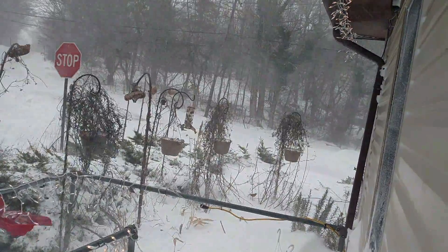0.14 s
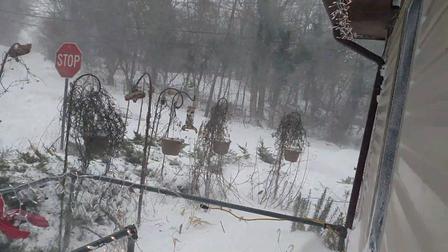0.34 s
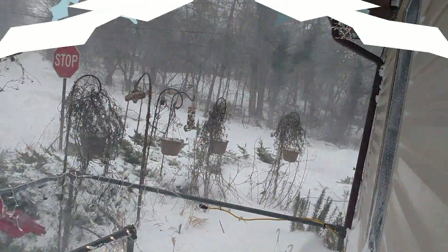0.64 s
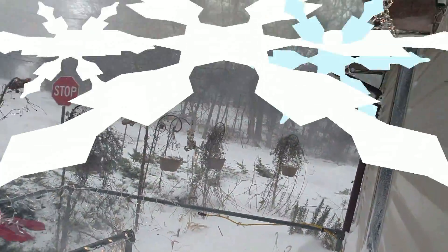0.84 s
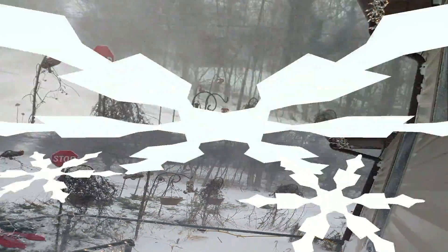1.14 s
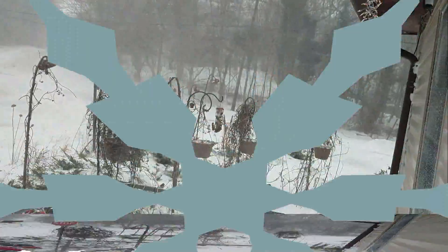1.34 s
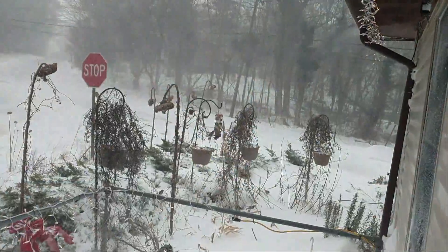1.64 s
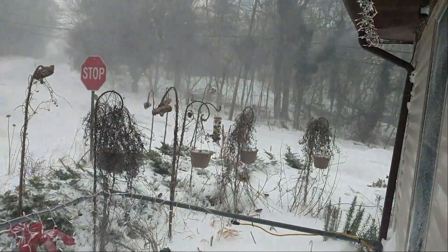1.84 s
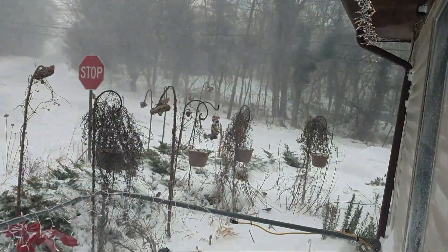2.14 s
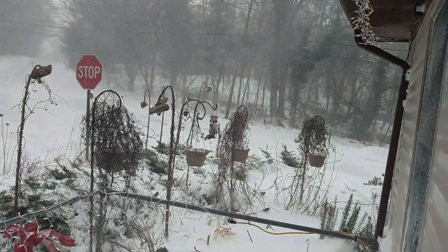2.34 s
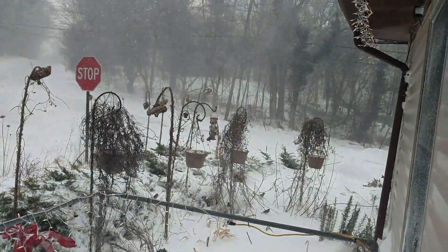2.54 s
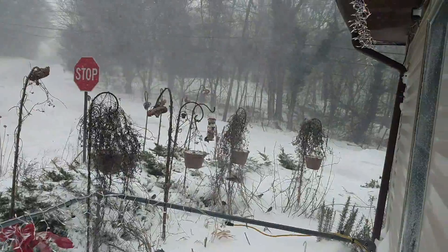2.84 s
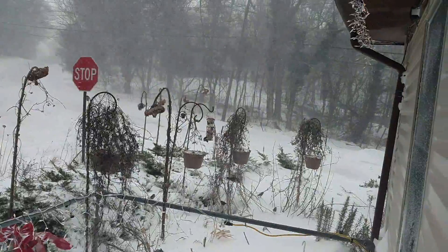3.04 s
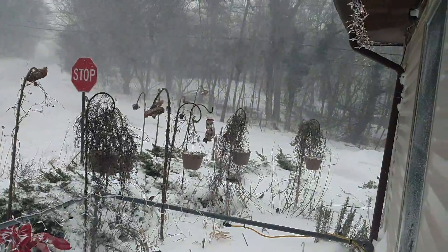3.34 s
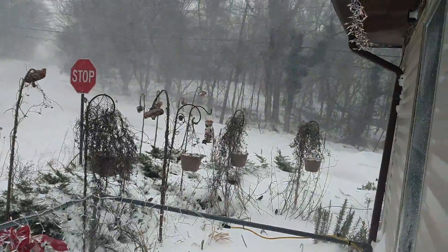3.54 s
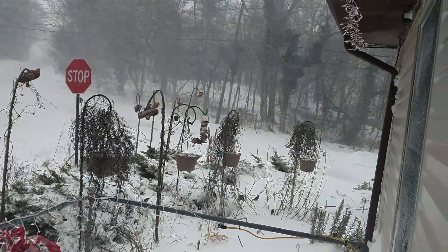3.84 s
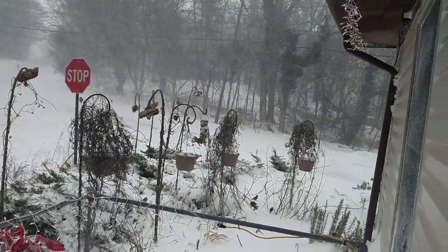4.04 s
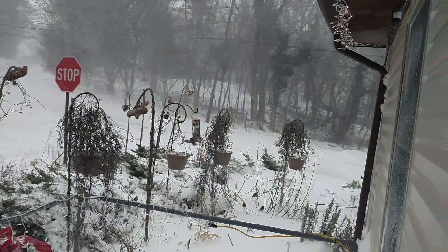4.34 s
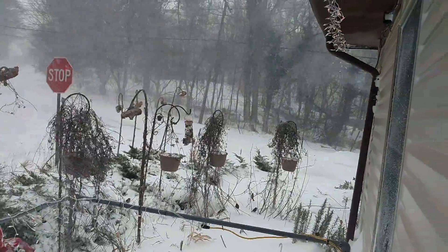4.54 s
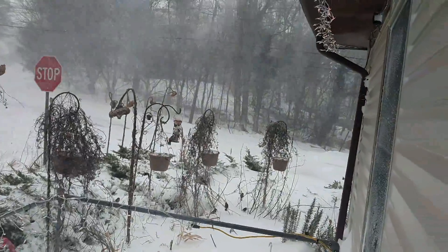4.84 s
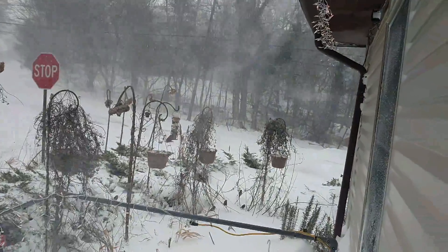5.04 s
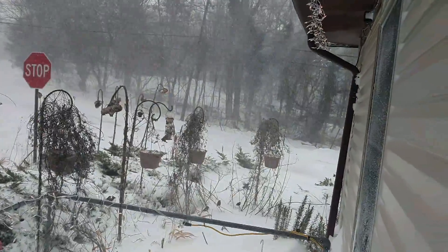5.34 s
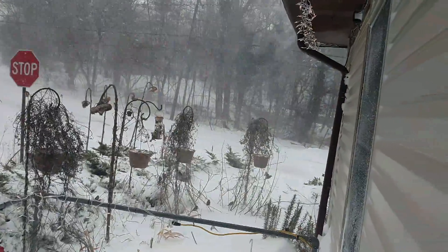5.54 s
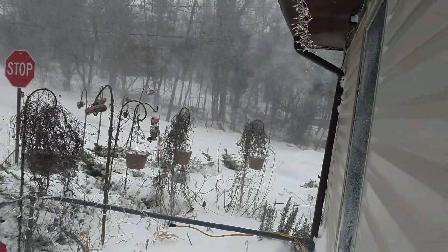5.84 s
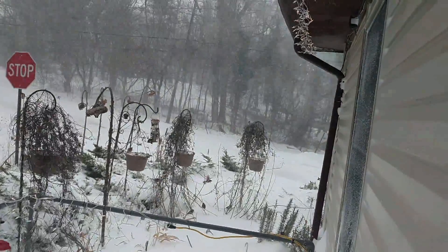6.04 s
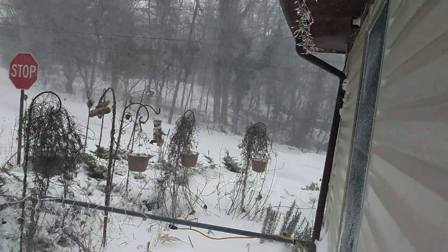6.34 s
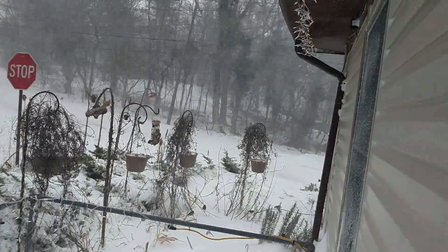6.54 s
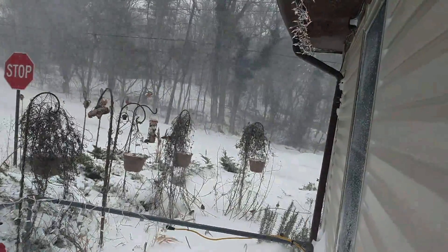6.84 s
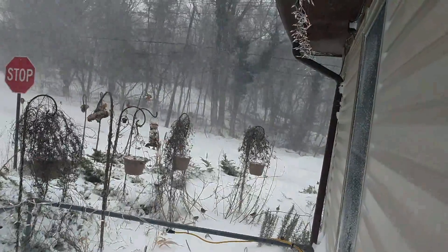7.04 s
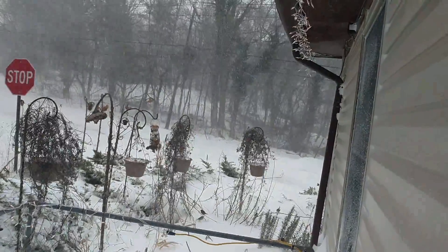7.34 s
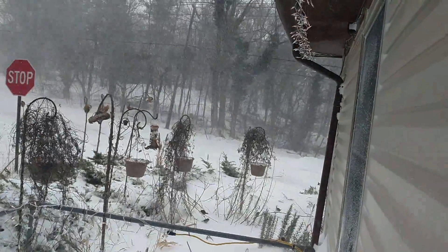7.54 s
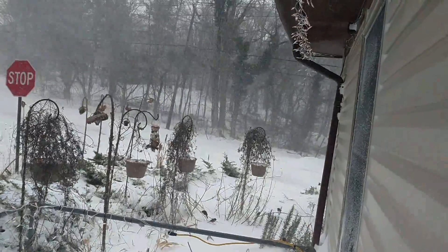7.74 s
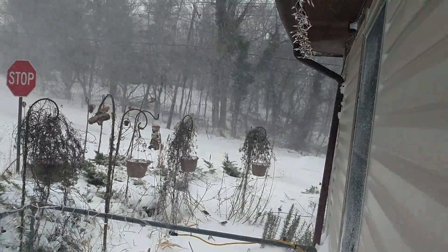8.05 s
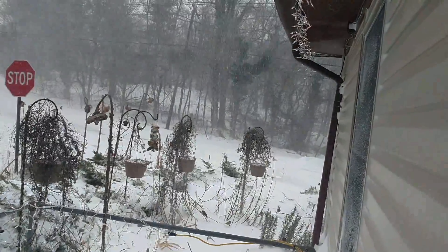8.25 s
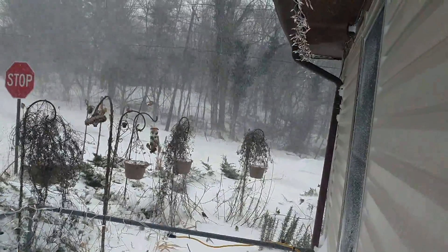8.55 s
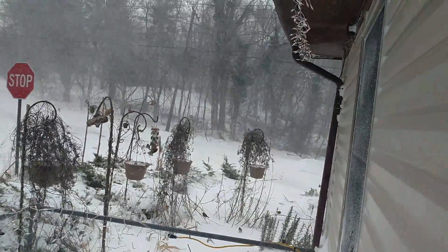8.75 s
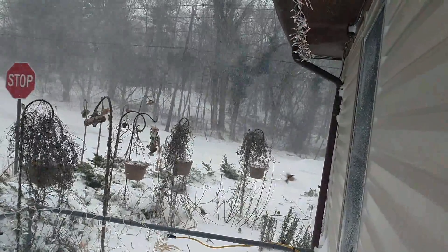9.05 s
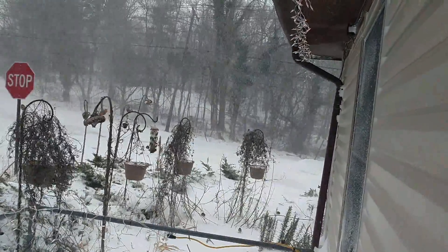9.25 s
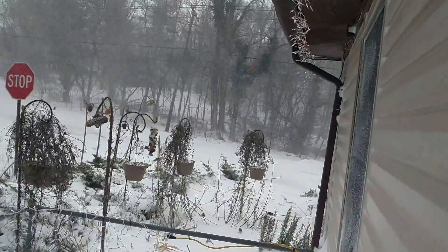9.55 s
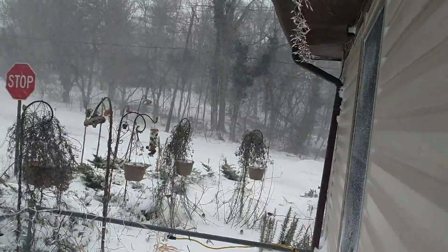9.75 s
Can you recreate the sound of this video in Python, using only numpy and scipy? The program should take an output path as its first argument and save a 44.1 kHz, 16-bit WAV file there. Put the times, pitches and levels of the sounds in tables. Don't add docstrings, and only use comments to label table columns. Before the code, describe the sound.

A handheld camera in a blizzard: sharp clicks, rough rubbing and a short creak come first, pulling the wind level down. The wide roar of trees returns with a fine snow hiss and a couple of dull pops. From about four seconds low buffeting batters both sides of the microphone in irregular bursts, heaviest past six, with a breathy high whistle and sprays of snow, before a calmer stretch and late knocks of wind.

```python
import sys
import numpy as np
from scipy import signal
from scipy.fft import rfft, irfft, next_fast_len
from scipy.io import wavfile
from scipy.ndimage import uniform_filter1d, map_coordinates

SR = 44100
rng = np.random.default_rng(int(sys.argv[2]) if len(sys.argv) > 2 else 0)


def store_pcm(level_fs):
    pcm = np.round(np.clip(level_fs, -1, 1) * 32767).astype(np.int16)
    wavfile.write(sys.argv[1], SR, np.atleast_2d(pcm).T)


def volts_from_db(level):
    exponent = np.asarray(level, float) / 20
    return 10 ** exponent


N = 437031


def unit(x):
    return x / np.sqrt(np.mean(x ** 2) + 1e-20)


def along(points, hz):
    f, v = np.transpose(points)
    return np.interp(np.log(hz + 1), np.log(f + 1), v)


def curves(rows):
    s, *columns = np.transpose(rows)
    s = np.maximum.accumulate(s)
    return [np.interp(np.arange(N) / SR, s, column) for column in columns]


def wobble(rate):
    knots = rng.standard_normal(6000)
    return map_coordinates(knots, [np.arange(N) * min(rate, 590) / SR])


def filtered(x, response):
    m = next_fast_len(x.shape[-1] + 8192)
    spectrum = rfft(x, m) * response(np.fft.rfftfreq(m, 1 / SR))
    return irfft(spectrum, m)[..., :x.shape[-1]]


def add(track, s, piece):
    start = round(s * SR)
    track[:, start:start + piece.shape[1]] += piece


def far(spectrum, patchy_db):
    # (frequency [Hz], likeness [0-1])
    alike = [(100, 0.96), (300, 1), (450, 0.89), (750, 0.76), (1000, 0.4), (1200, 0.4), (1500, 0.48),
             (2000, 0.66), (2400, 0.43), (8000, 0.057)]
    # (frequency [Hz], level [dB])
    louder = [(50, 0), (300, 3), (800, 5), (1400, 4.5), (1900, 0), (2500, 0.5), (5000, -1), (8000, -4.5),
              (11000, -2)]
    # (frequency [Hz], delay [ms])
    late_ms = [(100, 0.12), (400, 0.18), (800, 0.23), (1400, 0.33), (2100, 0.272)]

    z = signal.stft(rng.standard_normal((2, N)), nperseg=512)[2]
    patches = uniform_filter1d(rng.standard_normal(z.shape[1:]), size=6, axis=0)
    patches = uniform_filter1d(patches, size=10, axis=1)
    pair = signal.istft(z * volts_from_db(patchy_db * unit(patches)), nperseg=512)[1][:, :N]

    def split(hz):
        angle = np.arccos(np.clip(along(alike, hz), 0, 1)) / 2
        return volts_from_db(along(spectrum, hz)) * [np.cos(angle), np.sin(angle)]

    def skew(hz):
        half = volts_from_db(along(louder, hz) / 2) * np.exp(-1j * np.pi * hz * along(late_ms, hz) / 1000)
        return np.array([1 / half, half])

    shared, own = filtered(pair, split)
    return unit(filtered(np.array([shared + own, shared - own]), skew))


def storm():
    # (time [s], strength [dB], snow load [dB])
    wind = [(0, -17, -6), (.3, -21, 1), (.6, -11, 1), (1.0, -17.5, 4), (1.3, -13, -3), (1.65, -13, 0.5),
            (2.1, -12, -2), (2.8, -12, 0), (3.8, -15, -1.5), (4.3, -14.5, 4), (4.75, -16.5, 3.5),
            (5.8, -15.5, 1), (6.3, -17.5, 3), (7.4, -18.5, 2.5), (8.3, -12.5, 1), (8.8, -16.5, 1),
            (9.1, -15.5, 0), (9.91, -16, 1.5)]
    # (centre [s], length [s], level [dB])
    surges = [
        (1.973, 0.15, 2),
        (2.55, .2, -1),
        (3.706, 0.45, -1.5),
        (4.204, 0.22, -2),
        (6.85, 0.12, 0.5),
        (9.013, 0.55, 1),
        (9.353, 0.19, -2),
    ]
    # (frequency [Hz], density [dB per Hz])
    roar_spectrum = [(15, -42), (30, -32), (60, -23.5), (110, -6), (170, 1.5), (260, 1.5), (400, -4.5),
                     (600, -8), (850, -11.5), (1200, -24), (2000, -24), (4000, -57.5)]
    # (frequency [Hz], density [dB per Hz])
    hiss_spectrum = [(500, -75), (1000, 3.5), (1400, -1), (1900, 0), (2500, -5), (3500, -5.5), (4500, -11),
                     (6000, -14.5), (9000, -23.5), (16000, -104)]
    # (frequency [Hz], density [dB per Hz])
    spray_spectrum = [(2000, -27), (5000, 7.5), (7000, -3.5), (9000, -3), (11000, -9), (14000, -15),
                      (16000, -24)]
    hiss_db, hiss_per_snow, spray_db = -14, 0.074, -24

    wind_db, snow_db = curves(wind)
    gust = 0.5 * wobble(19) + 0.14 * wobble(3.23)
    roar = volts_from_db(4.0 + gust) * far(roar_spectrum, patchy_db=1.0)
    hiss_level = hiss_db + hiss_per_snow * snow_db + 5 + gust + 0.74 * wobble(14)
    hiss = volts_from_db(hiss_level) * far(hiss_spectrum, patchy_db=1.04)
    spray_level = spray_db + snow_db + gust + 0.53 * wobble(6)
    spray = volts_from_db(spray_level) * far(spray_spectrum, patchy_db=2.5)
    t = np.arange(N) / SR
    for s, length, db in surges:
        wind_db = wind_db + db * np.exp(-(2 * (t - s) / length) ** 2)
    return volts_from_db(wind_db + gain_db()) * (roar + hiss + spray)


def gain_db():
    # (time [s], depth [dB])
    ducks = [
        (0, 5.5),
        (0.349, 13.5),
        (.49, 21),
        (.62, 20),
        (.79, 21.5),
        (1.21, 16.5),
        (4.48, 2.5),
        (4.782, 9),
        (6.457, 11.5),
        (9.29, 0.5),
    ]
    hold_s, recover_s = 0.089, 0.9
    t = np.arange(N) / SR
    returns = []
    for s, db in ducks:
        fade = np.exp(-np.clip(t - s - hold_s, 0, None) / recover_s)
        returns.append(-db * (t >= s) * fade)
    return np.min(returns, axis=0)


def thumps():
    out, t = np.zeros((2, N + SR)), np.arange(-1000, 1400) / SR
    starts = .3 * rng.random(200) - .15
    for (s, db, hz, share), start in zip(eddies(), starts):
        envelope = np.exp(-(t * hz / np.where(t < 0, .6, .95)) ** 2)
        swing = envelope * np.cos(2 * np.pi * (hz * t + start))
        spike = (1 - share) * volts_from_db(.3 * db) * np.exp(-(t * hz / .085) ** 2)
        add(out, s + t[0], 1.13 * volts_from_db(db) * np.outer([share, share - 1], swing + spike))
    return filtered(out[:, :N], lambda hz: (1j * hz / (72 + 1j * hz)) ** 2)


def eddies():
    # (time [s], peak [dB], ring [Hz], share on first port [0-1])
    strong = [(4.29, -8, 190, 0.3), (4.655, -8, 120, 0.1), (4.738, -2, 180, 0.5), (4.779, -3, 222, 0),
              (5.035, -2, 139, 0.04), (5.188, 4, 140, 0.57), (5.286, -2, 151, 0.65), (5.717, -7, 131, 0.85),
              (5.836, -5.5, 139, .2), (6.051, -9, 130, 0.7), (6.172, -3, 130, 0.3), (6.198, -2, 130, 0.55),
              (6.397, -3, 119, 0.2), (6.425, 0, 200, 0.1), (6.459, -3, 160, 0), (6.505, 0, 186, 1),
              (6.53, -3, 162, 0), (6.584, 2.5, 192, 0.9), (6.789, -2, 175, 0), (6.812, 4, 180, 0.1),
              (6.835, -2, 191, 0.4), (6.876, -0.5, 172, 0.07), (6.977, -14, 140, 0.3),
              (7.157, -1, 200, 0.07), (7.224, 0, 178, 0), (7.253, -5, 140, 0.13), (7.472, -2, 180, 0.93),
              (7.664, -5, 150, 0), (9.286, -19, 160, 0.4), (9.871, -8, 161.3, 0)]
    # (time [s], peak [dB])
    grips = [
        (0.623, -11),
        (0.657, -17),
        (.772, -7.5),
        (0.833, -10.5),
        (0.871, -17),
        (0.923, -14),
        (1.184, -19),
        (1.217, -1.5),
        (1.233, -25),
        (1.377, -15),
    ]
    # (time [s], peak [dB])
    lesser = [(0.048, -26), (0.118, -21), (0.136, -22), (0.172, -22), (0.254, -24), (0.277, -18),
              (0.31, -27), (0.489, -18), (0.576, -15), (0.593, -24), (0.673, -16), (0.746, -10),
              (0.793, -19), (0.887, -26), (0.906, -24), (1.079, -24), (1.198, -19), (1.273, -11.5),
              (1.298, -30), (1.332, -26), (1.394, -21), (1.494, -22), (3.594, -9), (3.896, -10),
              (3.919, -13), (3.997, -9), (4.372, -18), (4.463, -6), (4.483, -11), (4.636, -18),
              (4.753, -12), (4.806, -11), (5.094, -11), (5.208, -10), (5.337, -12), (5.804, -10),
              (5.854, -12), (5.872, -10), (5.901, -13), (6.184, -5), (6.265, -5), (6.446, -10),
              (7.005, -10.5), (7.097, -3), (7.143, -4), (7.192, -8), (7.285, -18), (7.712, -11),
              (7.897, -10), (7.937, -14), (8.672, -15), (8.992, -13), (9.091, -13), (9.272, -4),
              (9.309, -8), (9.332, -13), (6.887, -4), (6.8, -8), (6.563, -11), (6.71, -13)]
    grip_hz, grip_share = 200, 0.083
    small_db, small_hz = 1, 162

    hits = [*strong]
    hits += [(s, db, grip_hz, grip_share) for s, db in grips]
    pitch, side = rng.random((72, 2)).T
    for (s, db), p, d in zip(lesser, pitch, side):
        hits.append((s, db + small_db, small_hz * 2 ** (0.71 * (p - .5)), d ** 2))
    return hits


def buffet():
    # (frequency [Hz], density [dB per Hz])
    eddy_spectrum = [(10, -30), (20, -54), (50, -2), (80, 1), (140, 6), (200, -18), (300, -5.5),
                     (500, -15.5), (1000, -25), (3000, -53.5)]
    hits = rng.random((2, N)) < 90 / SR
    patter = hits * rng.standard_normal((2, N))
    churn = unit(patter) + .8 * rng.standard_normal((2, N))
    churn = churn - .4 * churn[::-1]
    churn = unit(filtered(churn, lambda hz: volts_from_db(along(eddy_spectrum, hz))))
    flicker_db = 3.5 * wobble(8.7)
    return turbulence() * volts_from_db(2.0 + flicker_db) * churn


def turbulence():
    # (start [s], length [s], level [dB])
    spells = [(.52, 0.81, -43), (3.807, 0.25, -31), (4.2, 0.76, -30), (4.928, 0.48, -25), (5.6, 1, -28),
              (6.38, 0.25, -21), (6.547, 0.31, -26.5), (6.734, 0.51, -21.5), (7.2, 0.96, -31),
              (9.0, 0.73, -33), (9.75, 0.37, -28)]
    calm_db, edge = -42.5, 0.26
    level = np.full((1, N + SR), volts_from_db(calm_db))
    for s, length, db in spells:
        add(level, s, volts_from_db(db) * signal.windows.tukey(round(length * SR), edge)[None])
    return level[0, :N]


def scrapes():
    # (time [s], length [s], level [dB], tilt [dB per octave], panel ring [Hz])
    rubs = [(0.301, 0.069, -28.5, 5.5, 3470), (.3495, .0022, -21, 2, 3200), (0.351, 0.011, -19, 2, 1116),
            (0.356, 0.09, -28.5, -3.5, 1090), (0.373, 0.0078, -23, -1, 2110), (0.392, 0.051, -30, -2, 3300),
            (0.455, 0.0045, -23, -1, 3800), (0.477, 0.016, -21.5, 2, 4500), (0.5, 0.079, -33.5, -1, 2500),
            (0.53, 0.0099, -29, 0, 1800), (0.6008, 0.014, -20, 1, 9200), (0.613, 0.021, -14.5, 2.5, 3000),
            (0.633, 0.045, -25.5, 0, 1110), (0.703, .015, -33, -2, 1900), (1.181, .0015, -29, 1, 3800),
            (1.206, .0012, -22, -1.3, 1050), (1.208, 0.0025, -21, -1.5, 950),
            (1.215, 0.0029, -38, -2, 2200), (1.373, .004, -25, -3, 2500), (1.39, .004, -19, -1, 900),
            (1.485, 0.0051, -38, -1, 1800)]
    # (frequency [Hz], density [dB per Hz])
    body = [(150, -32), (400, 2), (1100, -4.5), (2000, -5), (3200, -10.5), (6000, -18.5), (9000, -24.5),
            (15000, -40)]
    first_share = 0.52

    out = np.zeros((2, N))
    for s, length, db, tilt_db, ring_hz in rubs:
        u = np.arange(SR // 10) / (length * SR)
        roughness = np.repeat(rng.standard_normal(len(u) // 30), 30)
        grit = rng.standard_normal((3, len(u))) * volts_from_db(4 * roughness)
        grit[:, 4] += np.sign(grit[:, 4]) * (.007 / length) ** 2

        def panel(hz):
            damping = .2j * hz * ring_hz
            ring = 1 + damping / (ring_hz ** 2 - hz * hz + damping)
            return ring * volts_from_db(along(body, hz) + tilt_db * np.log2(hz / 2000 + .05))

        tone = unit(filtered(grit[:2] + 0.49 * grit[2], panel))
        fade = np.exp(-u ** 2.3 * 0.73)
        add(out, s, 2 * volts_from_db(db) * np.outer([first_share, 1 - first_share], fade) * tone)
    return out


def snaps():
    # (time [s], peak [dB], ring [Hz], time to die [cycles], share on
    contacts = [(.3493, 1.5, 3570, 6, 0.6), (.3505, -5, 1110, 9.5, .5), (.358, -13, 720, 5, .5),
                (.3748, -9, 1150, 3, .5), (.4315, -20, 3000, 3, .5), (.4775, -5, 2920, 8.6, .5),
                (.6018, -3, 1300, 3.3, .5), (.6040, -9.5, 9000, 16, .5), (.6085, -6, 1500, 3.6, .5),
                (.6192, -8, 1200, 2.5, .5), (.6232, -4, 3300, 6, .5), (.6272, -7, 1300, 3.5, .5),
                (.6312, -6, 900, 4.6, .5), (.6365, -14, 800, 3, .5), (.6725, -11, 500, 2.2, .5),
                (.873, -41, 5080, 140, .5), (.898, -44, 5220, 140, .5), (1.1745, -24, 900, 6, .5),
                (1.1805, -10, 320, 2.2, .5), (1.39, -13, 900, 3, .5), (1.869, -9, 700, 2.5, .3),
                (1.181, -21, 3800, 5, .5), (1.2058, 1.5, 1100, 2, 0.4), (1.206, -18, 6800, 6, 0.4),
                (1.2084, -1, 1000, 3, 0.4), (1.2125, -18, 3800, 8, .5), (2.013, -1, 600, 2.5, .3),
                (2.031, -3, 600, 2.5, .3), (2.944, -5, 700, 2.5, .3), (6.456, -0.5, 500, 3.3, .2),
                (6.526, -1, 595, 3.3, 0.1), (6.543, -10, 350, 2.5, .3), (6.554, -14, 350, 2.5, .3),
                (6.838, -5, 450, 3.5, .3), (6.811, -7, 650, 2.5, 0.2), (7.11, -5, 500, 2.5, .3),
                (7.231, -7, 450, 2.5, .3), (8.988, 4, 700, 3, .3)]
    out, t = np.zeros((2, N)), np.arange(1200) / SR
    for s, db, hz, cycles, share in contacts:
        push = np.minimum(.5 + 1.3 * t * hz, 1.6)
        decay = volts_from_db(db - 60 * t * hz / (2 * cycles))
        add(out, s, np.outer([share, 1 - share], push * decay * np.sin(2 * np.pi * hz * t)))
    return out


def creak():
    start_s, length_s, slip_hz, slip_jitter = .405, .108, 161, .03
    slip_db, plate_db, plate_hz, plate_width_hz = -20, -24, 710, 360
    plate_peak = 0.57

    out, u = np.zeros((2, N)), np.linspace(0, 1, round(length_s * SR))
    rate = slip_hz * (1 + slip_jitter * wobble(80)[:len(u)])
    phase = 2 * np.pi * np.cumsum(rate) / SR
    order = np.arange(2, 10)[:, None]
    hz = slip_hz * order
    plate = np.abs(hz * plate_width_hz / (plate_hz ** 2 - hz * hz + 1j * hz * plate_width_hz)) ** 2
    partials = plate * np.cos(order * phase + 2 * np.pi * rng.random(hz.shape))
    overtones = partials.sum(axis=0) * volts_from_db(1.8 * wobble(146)[:len(u)])
    swell = np.exp(-((u - plate_peak) / np.where(u < plate_peak, .5, .16)) ** 2)
    tone = volts_from_db(slip_db) * np.sin(phase) + volts_from_db(plate_db) * swell * overtones
    tone = np.sin(np.pi * u) ** 0.24 * tone
    add(out, start_s, np.array([tone, 0.83 * tone]))
    return out


def hook():
    # (start [s], length [s], mode [Hz], width [Hz], level [dB])
    modes = [(.352, .016, 720, 70, -22), (.37, .04, 1020, 150, -27), (.478, .015, 3150, 90, -18.5),
             (.53, .07, 1950, 70, -41), (.885, .06, 1945, 20, -43), (.876, .052, 3440, 20, -45),
             (.87, .055, 5900, 60, -56), (.865, .1, 3600, 900, -39.5), (.948, .04, 1975, 20, -41.5),
             (.96, .045, 5060, 20, -55), (.956, .03, 5775, 20, -49.5), (.96, .07, 3950, 40, -56),
             (.98, .06, 1945, 16, -42.5), (.995, .028, 5790, 22, -52), (1.035, .022, 5760, 22, -53)]
    out = np.zeros((2, N))
    for s, length, hz, width_hz, db in modes:
        friction = rng.standard_normal(SR // 4)
        ring = filtered(friction, lambda f: f * width_hz / (hz * hz - f * f + 1j * f * width_hz))
        fade = np.hanning(round(length * SR)) ** .4
        even = 30 / width_hz * np.sin(2 * np.pi * hz * np.arange(len(fade)) / SR)
        tone = volts_from_db(db) * fade * (.5 * unit(ring)[-len(fade):] + even)
        add(out, s, np.array([tone, .6 * np.roll(tone, 13)]))
    return out


def whistles():
    # (start [s], length [s], pitch [Hz], level [dB])
    tones = [
        (1.985, .05, 5500, -39),
        (4.492, 0.034, 7440, -37),
        (4.517, .03, 7300, -39),
        (5.601, 0.19, 7340, -29.5),
    ]
    swoop, settle, waver = .14, .11, .019
    out = np.zeros((1, N))
    for s, length, hz, db in tones:
        t = np.arange(round(length * SR)) / SR
        drift = (waver * wobble(74.0) + 0.005 * wobble(156))[:len(t)]
        pitch = hz * (1 + swoop * np.exp(-t / (settle * length)) + drift)
        flutter = 1 + .45 * wobble(420)[:len(t)]
        tone = np.sin(2 * np.pi * np.cumsum(pitch) / SR)
        add(out, s, (volts_from_db(db) * np.hanning(len(t)) * flutter * tone)[None])
    return out * volts_from_db([[3], [-3]])


def flurries():
    # (time [s], length [s], level [dB])
    handfuls = [(4.099, 0.016, -26.5), (4.224, .03, -32), (4.294, 0.03, -27), (4.366, 0.061, -31),
                (4.43, 0.061, -31), (4.537, .03, -31), (4.603, 0.22, -33), (4.952, .03, -37),
                (5.646, 0.11, -31.5), (6.047, 0.22, -31.5), (6.3, 0.18, -39), (6.88, 0.073, -36),
                (7.14, 0.061, -35), (8.122, .02, -30), (9.208, .073, -35), (8.798, .5, -47)]
    # (frequency [Hz], density [dB per Hz])
    flakes = [(1500, -11), (3500, 5.5), (6500, -3), (9000, -4), (12000, -14), (16000, -22)]
    swell = np.zeros((2, N))
    for s, length, db in handfuls:
        add(swell, s, volts_from_db(db) * np.hanning(round(length * SR))[None])
    return swell * far(flakes, patchy_db=1.5)


def powder():
    # (time [s], level [dB])
    cloud = [
        (0, -66),
        (.5, -69),
        (1.1, -70),
        (5.2, -70),
        (5.7, -58),
        (6.2, -52),
        (6.45, -56),
        (6.48, -62),
        (7.5, -58),
        (8.4, -70),
    ]
    # (frequency [Hz], density [dB per Hz])
    powder_spectrum = [(7000, -30), (9000, -8), (11500, 2), (14000, -5), (16000, -15)]
    return volts_from_db(curves(cloud)[0]) * far(powder_spectrum, patchy_db=2.2)


def scene():
    weather = storm() + flurries() + buffet() + thumps()
    handling = scrapes() + whistles() + hook() + creak() + snaps()
    return weather + handling + powder()


def widen(ports):
    # (frequency [Hz], share of the copy [0-1])
    cross = [(30, 0.34), (500, 0.88), (2500, 0.62), (5000, 0.59), (7700, 0.57), (10000, 0.76),
             (13000, 0.81)]
    # (frequency [Hz], share [0-1])
    feedback = [(900, 0.0069), (2400, 0.25), (6000, 0.24), (13000, 0.21)]
    delay_s = .000389

    def comb(hz):
        late = np.outer([1, -1], np.exp(-2j * np.pi * hz * delay_s))
        return (1 - along(cross, hz) * late) / (1 - np.clip(along(feedback, hz), 0, .6) * late)

    mid, side = filtered(np.array([ports[0] + ports[1], ports[0] - ports[1]]) / 2, comb)
    return np.array([mid + side, mid - side])


def band_limit(x):
    return signal.sosfilt(signal.butter(12, 15700, fs=SR, output="sos"), x)


def record(dry):
    # (frequency [Hz], gain [dB])
    top = [(15200, 0), (15300, -9), (15490, -9), (15560, -70)]
    wide = widen(dry)
    held = wide / (1 + np.abs(wide / .99) ** 16) ** (1 / 16)
    mix = filtered(held, lambda hz: volts_from_db(along(top, hz)))
    return band_limit(mix)


dry = scene()
out = record(dry)
store_pcm(out)
```